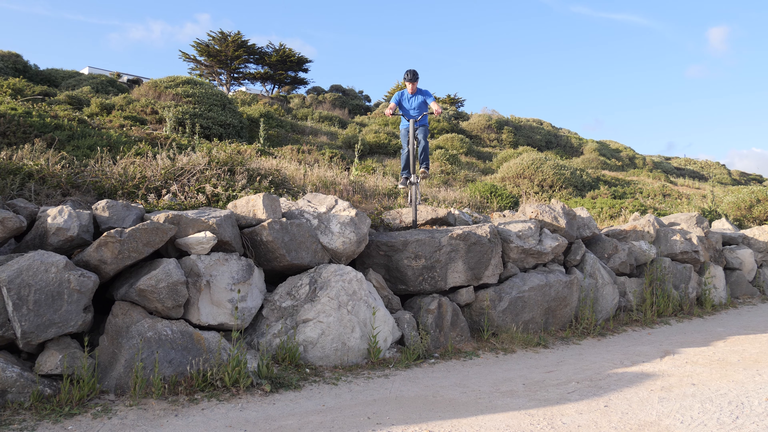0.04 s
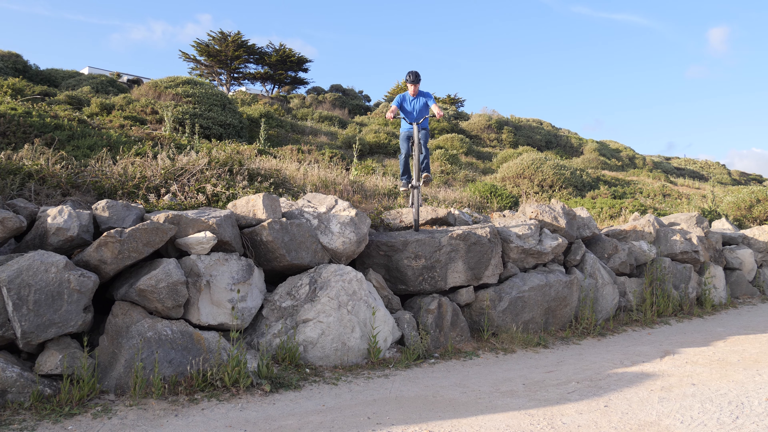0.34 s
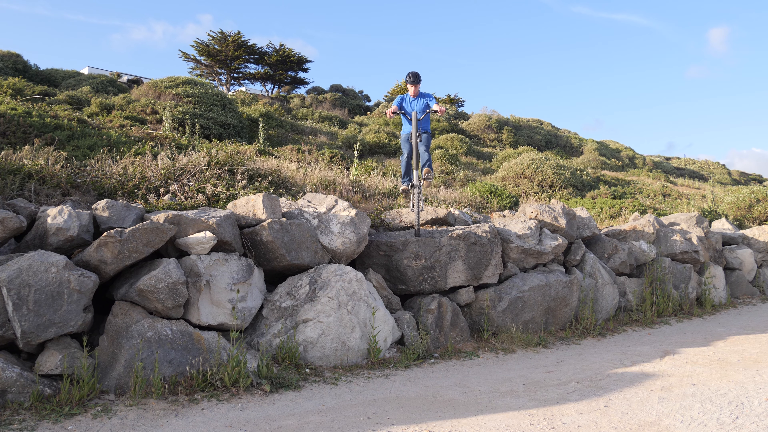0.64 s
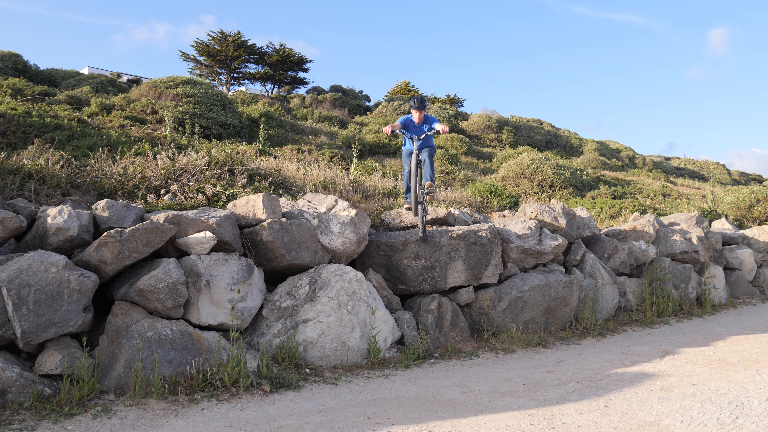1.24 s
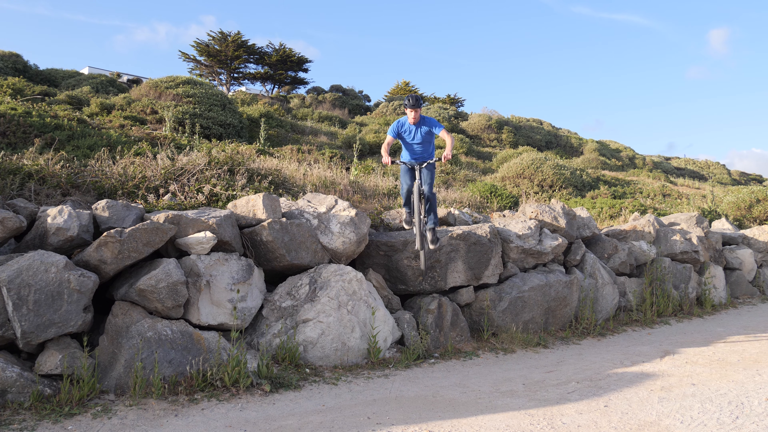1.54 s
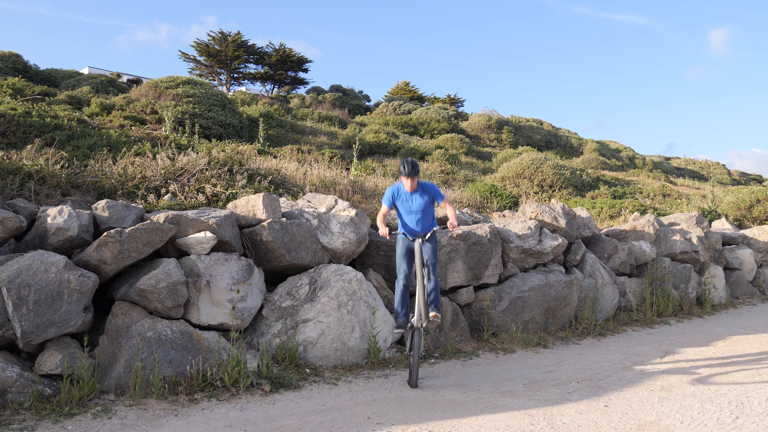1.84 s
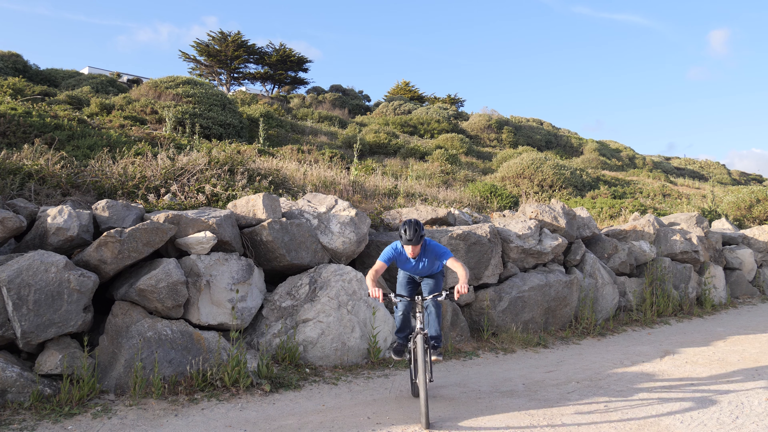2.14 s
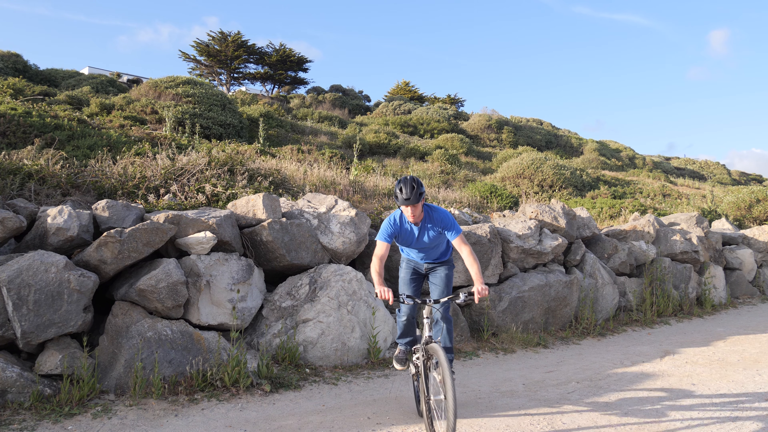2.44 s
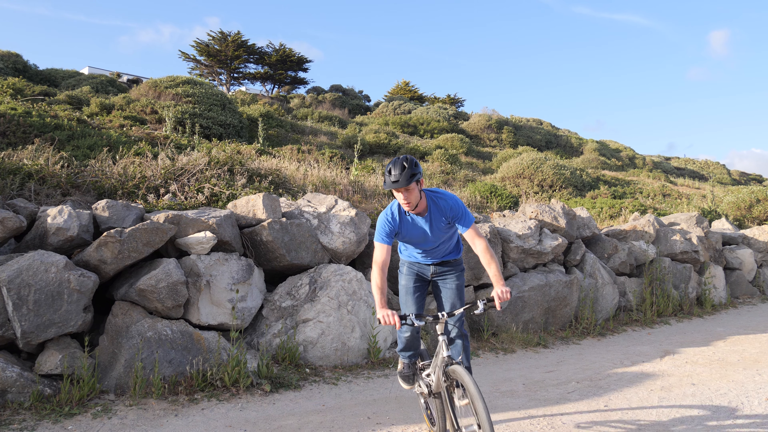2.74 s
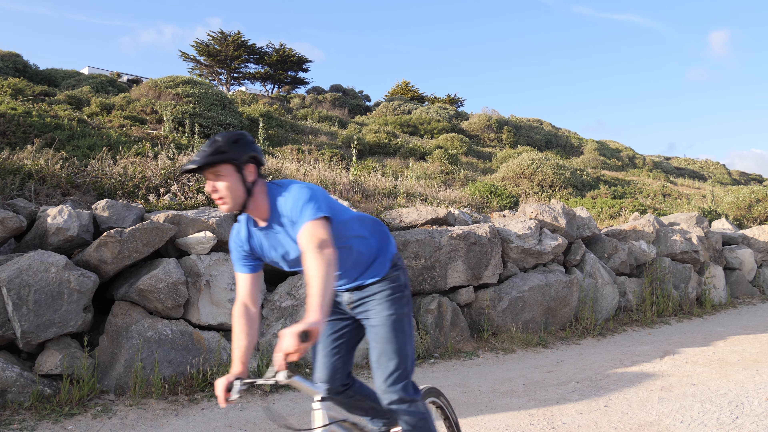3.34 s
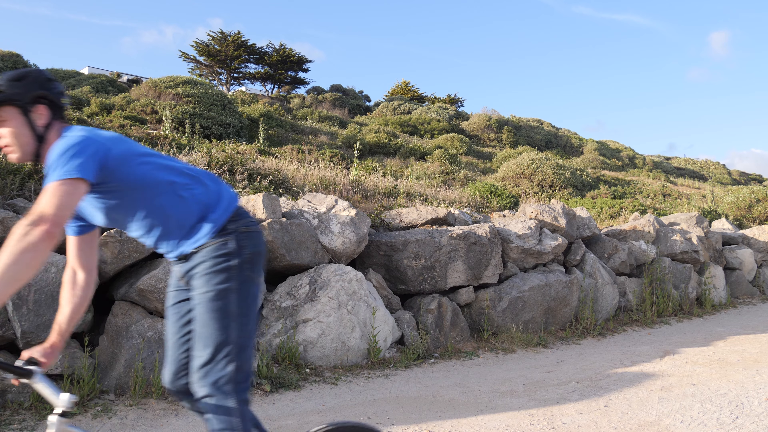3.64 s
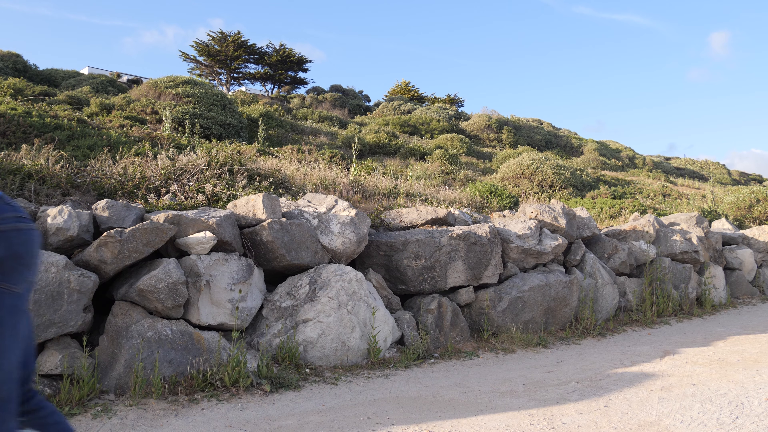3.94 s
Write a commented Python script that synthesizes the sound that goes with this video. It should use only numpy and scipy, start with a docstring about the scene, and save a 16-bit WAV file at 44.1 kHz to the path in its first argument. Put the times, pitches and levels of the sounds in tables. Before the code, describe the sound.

Outdoors, a bike shifts on rock with soft clicks, then hops down with a brief squeal of brakes. Its hub ticks as it rolls close by over gravel and popping stones, with wind rumbling on the microphone throughout.

```python
"""Trials bike hopping off a rock

A bike shuffles on a rock wall, hops off, lands with squealing brakes and rolls past on gravel.
Its freehub ticks as small catches (pawls) drop over teeth, and the brake pads make the disc sing.
A tyre creaks as it sticks and slips on the rock, and stones pop from under the wheels.
Wind buffets the microphone throughout, over a faint outdoor hush."""
import sys
import numpy as np
from scipy import signal
from scipy.fft import rfft, irfft
from scipy.io import wavfile
from scipy.ndimage import uniform_filter1d

SR = 44100
rng = np.random.default_rng(int(sys.argv[2]) if len(sys.argv) > 2 else 0)


def master_out(mix):
    """Clip the mix to full scale and print it as 16-bit PCM to the path in sys.argv[1]."""
    frames = np.transpose(np.atleast_2d(mix))
    ceiling = np.clip(frames, -1, 1)
    pcm = np.round(ceiling * 32767).astype(np.int16)
    wavfile.write(sys.argv[1], SR, pcm)


N = 176400
T = np.arange(N) / SR

# How loud the wind, gravel and spinning tyres are. Each row: time in seconds, level in dB.
WIND_LEVELS = [(0, -26.5), (.3, -30), (.8, -19), (1.08, -24.5), (1.3, -15.5), (1.55, -19.5), (1.9, -13),
               (2.4, -15.5), (2.75, -14), (3.15, -12), (3.55, -12.5), (3.85, -10.5), (4, -21.5)]
GRAVEL_LEVELS = [(1.86, -45), (1.92, -44), (2.15, -43), (2.3, -47.5), (2.6, -53.5), (2.9, -46), (3.08, -40),
                 (3.29, -34.5), (3.39, -37), (3.44, -35.5), (3.5, -34), (3.58, -32), (3.7, -38.5),
                 (3.82, -35.5), (3.9, -43.5), (3.97, -50), (4, -29.5)]
WHIRR_LEVELS = [(1.6, -54), (1.66, -43.5), (1.85, -49.5), (1.9, -48)]
# The tone colour of each noisy sound. Each row: frequency in Hz, level in dB.
WIND_COLOUR = [(10, -6.5), (22, 5), (35, 0), (70, -12), (100, -17.5), (160, -25), (220, -28.5), (400, -39),
               (12000, -115)]
HUSH_COLOUR = [(400, -2), (1600, -4.5), (2500, -9.5), (6500, -16), (9000, -20.5), (11000, -34),
               (16000, -43)]
GRAVEL_COLOUR = [(120, -7.5), (220, -11), (450, -2), (1400, -4.5), (2700, -9), (4200, -21.5), (8000, -22.5),
                 (16000, -34)]
CRACK_COLOUR = [(300, -11.5), (1400, -1.5), (2200, -7.5), (4200, -12), (16000, -36.5)]
TYRE_COLOUR = [(400, -22), (850, -7.5), (1100, -6.5), (1500, 3.5), (1850, 0), (2250, 0.5), (2800, -10.5),
               (12000, -30)]
RASP_COLOUR = [(500, -13.5), (1400, -6.5), (2200, -9), (2850, 3.5), (4000, -11), (5500, -10.5), (9000, -32)]
HUB_COLOUR = [(500, -18), (1500, -25), (2500, 1.5), (3500, 5), (4300, -4.5), (6000, -5), (7500, 0),
              (8500, 5), (10100, -10), (12300, -2), (12900, -7), (13600, 6.5), (14400, -10), (15700, 0.5)]
WHEEL_COLOUR = [(700, -20), (1500, 4), (3500, 2.5), (4800, -4.5), (8500, 3), (10200, -8.5), (13500, -4),
                (14600, -31)]
# Wind thumps and stone pops. Each row: time in seconds, peak in dB, pitch in Hz, width in cycles.
WIND_THUMPS = [(1.28, -13, 36.5, 0.86), (2.545, -2, 52.8, 0.92)]
STONE_POPS = [(3.297, -1.5, 1700, 1.03), (3.2973, -10.5, 4160, 1), (3.3026, -18, 1500, 1.4),
              (3.311, -22.5, 2100, 2.5), (3.407, -20, 1900, .5), (3.5938, -12.5, 1430, 1.9)]
# A tyre twists on rock. Each row: time in seconds, slips per second, level in dB, resonance in Hz.
CREAK = [(.19, 370, -60, 1050), (.25, 357, -51.5, 1090), (.42, 360, -47.5, 1110), (.45, 368, -48, 2010),
         (.51, 358, -45, 1780), (.555, 270, -48, 1500)]
# Tyre blows. Each row: peak time in seconds, level in dB, rise and decay in seconds, centre in Hz.
BLOWS = [(.181, -36.5, 0.0026, .018, 483), (.182, -36, .0015, 0.0084, 2300),
         (1.475, -32.5, .0015, 0.014, 1320), (1.881, -27, 0.0009, 0.0064, 1200),
         (1.892, -32, .0029, 0.015, 614), (2.103, -20, 0.0055, 0.016, 1300),
         (2.336, -34, .0006, 0.0038, 1160), (2.706, -35.5, 0.00071, 0.0061, 746),
         (3.08, -32.5, 0.017, 0.011, 1430), (3.493, -27.5, 0.0065, 0.019, 1240),
         (3.545, -31, 0.00091, .005, 1300), (3.57, -22.5, .003, 0.0084, 1250),
         (3.593, -23.5, 0.011, .0043, 1370), (3.651, -21, .0011, .0024, 1400),
         (3.663, -25, .003, 0.011, 1800), (3.751, -23.5, 0.0065, 0.01, 789),
         (3.828, -31.5, 0.0017, 0.011, 1400)]
# A blow's tone colour. Each row: multiple of its centre frequency, level in dB.
BLOW_COLOUR = [(.15, -11), (.5, -1), (1, 2), (1.3, 0), (2, -8.5), (8, -34.5)]
# Metal knocks and lone pawl clicks. Each row: start in seconds, level in dB.
KNOCKS = [(1.484, -35.5), (2.1322, -23), (2.177, -36)]
PAWL_CLICKS = [(.139, -42), (.157, -46), (.180, -41), (.2585, -44), (.7883, -41.5), (.9314, -46),
               (1.0113, -43), (1.0656, -41), (1.0886, -42), (1.112, -46), (1.152, -38), (1.175, -48),
               (1.188, -40.5), (1.21, -44), (1.2348, -43.5), (1.2647, -45), (1.324, -42.5)]
# The notes that metal parts ring at. Each row: pitch in Hz, level in dB, seconds to fade by 60 dB.
KNOCK_MODES = [(1580, -18, .072), (3040, -2, 0.033), (3260, -3.5, 0.023), (8400, -6.5, .019)]
DISC_MODES = [(791, -29, 0.16), (805, -42, 1.1)]
HUB_MODES = [(6780, -26.5, 0.094), (7900, -23, 0.085), (8560, -25.5, 0.079)]
# The brake disc shudders. Each row: time in seconds, level in dB.
JUDDER_LEVELS = [(2.075, -42), (2.09, -30), (2.103, -22.5), (2.115, -28), (2.13, -42)]
# One table per squeal. Each row: time in seconds, pitch in Hz, level in dB, roughness (0 is clean).
SQUEALS = [
    [(.64, 1450, -46, 1), (.650, 1400, -34.5, 1), (.664, 1430, -49, 0.9)],
    [(1.905, 1520, -46, 1), (1.92, 1443, -39, 1.1), (1.945, 1400, -51, 0.9)],
    [(1.973, 1480, -44, 1), (1.979, 1474, -34.5, 0.96), (1.994, 1544, -30.5, .15),
     (2.008, 1454, -21.5, 0.15), (2.022, 1425, -22, .08), (2.032, 1342, -34.5, 0.5), (2.04, 1385, -34, 0.3),
     (2.056, 1470, -41, 0.4), (2.066, 1464, -30, 0.52), (2.088, 1438, -23.5, 0.05),
     (2.097, 1427, -35, 0.45), (2.126, 1438, -37, 0.2)],
]
# A squeal's harmonics, lowest first. Each row: level in dB when clean, level in dB when rough.
SQUEAL_HARMONICS = [(2, 0.5), (-10, -1), (-22, -13.5), (-35, -11.5)]
# One table per spin of the freehub. Each row: time in seconds, ticks per second, level in dB.
HUB_SPINS = [
    [(.485, 58, -48), (.51, 110, -44.5), (.56, 164, -42), (.655, 145, -46), (.675, 100, -60)],
    [(1.608, 230, -44.5), (1.74, 300, -38.5), (1.82, 336, -38.5), (1.92, 187, -39), (1.97, 120, -47.5),
     (2.05, 80, -49.5), (2.3, 98, -46), (2.52, 101, -45), (2.56, 66, -51.5), (2.74, 78, -46.5),
     (2.85, 98, -43), (3.05, 123, -41.5), (3.33, 140, -47.5), (3.5, 127, -39), (3.66, 120, -36),
     (3.72, 106, -37.5), (4.0, 107, -37.5)],
]


def undb(db):
    """Turn decibels into a gain."""
    return 10 ** (np.asarray(db) / 20)


def noise():
    """White noise of unit level."""
    return rng.standard_normal(N)


def curve(rows, column=1):
    """One column of a table, joined by straight lines in time."""
    rows = np.array(rows)
    return np.interp(T, rows[:, 0], rows[:, column])


def loudness(rows, column=1):
    """Gain from a dB column, silent outside the table's times."""
    return undb(curve(rows, column)) * (T >= rows[0][0]) * (T <= rows[-1][0])


def drift(rate_hz):
    """A smooth random wander of unit spread."""
    width = max(int(SR / rate_hz), 1)
    smooth = uniform_filter1d(uniform_filter1d(noise(), width), width)
    return smooth / smooth.std()


def colour(x, points, size=16384):
    """Give x a tone colour; white noise keeps its power."""
    hz, db = np.array(points).T
    gain = undb(np.interp(np.log(np.arange(size // 2 + 1) * SR / size + 1), np.log(hz), db))
    # fold the filter so that it never rings before a sound
    cepstrum = irfft(np.log(gain))
    cepstrum[1:size // 2] *= 2
    cepstrum[size // 2 + 1:] = 0
    response = irfft(np.exp(rfft(cepstrum)))
    return signal.fftconvolve(x, response / np.linalg.norm(response))[:N]


def fade(x, decay_s):
    """Give each spike in x a dying tail."""
    return signal.lfilter([1], [1, -np.exp(-1 / (SR * decay_s))], x + 1e-18)


def kicks(rows):
    """One spike per row, at its time and level."""
    out = np.zeros(N)
    for at, db, *_ in rows:
        out[int(at * SR)] += undb(db)
    return out


def ring(x, modes):
    """Fading notes set going by x."""
    t = T[:SR]
    notes = sum(undb(db - 60 * t / t60) * np.sin(2 * np.pi * hz * t) for hz, db, t60 in modes)
    return signal.fftconvolve(x, notes)[:N]


def pulses(rows):
    """Pressure pulses, each only a few waves long."""
    out = 0
    for at, db, hz, cycles in rows:
        swell = np.exp(-np.minimum(((T - at) * hz / cycles) ** 2, 20))
        out += undb(db) * swell * np.cos(2 * np.pi * hz * (T - at))
    return out


def wind(hush_db=-47.5):
    """Gusts rumble and thump on the microphone over a steady hush."""
    rumble = colour(noise(), WIND_COLOUR) * undb(curve(WIND_LEVELS) + 1.83 * drift(27))
    hush = colour(noise(), HUSH_COLOUR) * undb(hush_db + .5 * drift(1))
    return rumble + pulses(WIND_THUMPS) + hush


def gravel(grains_per_s=2200, spread_db=3.5, grain_s=.0006):
    """Many tiny grains are crushed under the tyres."""
    grains = rng.random(N) < grains_per_s / SR
    strength = undb(spread_db * np.minimum(rng.exponential(size=N), 5))
    power = fade((grains * strength) ** 2, grain_s / 2)
    return colour(np.sqrt(power / power.mean()) * noise(), GRAVEL_COLOUR) * loudness(GRAVEL_LEVELS)


def stones():
    """A pinched stone snaps free: a sharp pulse, a crack and scattering grit."""
    snaps = kicks(STONE_POPS)
    crack = undb(-19) * fade(snaps, decay_s=.0022)
    grit = undb(-26) * fade(snaps, decay_s=.023)
    return pulses(STONE_POPS) + colour(noise() * (crack + grit), CRACK_COLOUR)


def tyre_whirr():
    """The spinning tyres whirr in flight."""
    return colour(noise(), TYRE_COLOUR) * loudness(WHIRR_LEVELS)


def tyre_creak(jitter=.036, rasp=.51, resonance_db=-2, width_hz=260):
    """Rubber sticks and slips on rock; the overtone nearest a moving resonance stands out."""
    rate = curve(CREAK) * (1 + jitter * drift(455))
    cycles = np.cumsum(rate) / SR
    slips = np.diff(np.floor(cycles), prepend=0)
    rub = colour((slips - slips.mean()) / slips.std() + rasp * noise(), TYRE_COLOUR)
    resonance_hz = curve(CREAK, column=3)
    overtones = 0
    for k in range(2, 8):
        nearness = np.exp(-((k * rate - resonance_hz) / width_hz) ** 2)
        overtones += nearness * np.cos(2 * np.pi * k * cycles)
    return (rub + undb(resonance_db) * overtones) * loudness(CREAK, column=2)


def tyre_blows():
    """A tyre bites into rock or grit with a short swell of crunch."""
    out = 0
    for at, db, rise, decay, hz in BLOWS:
        from_peak = np.maximum((at - T) / rise, (T - at) / decay)
        swell = np.exp(-np.minimum(from_peak, 20))
        tone = [(hz * multiple, level) for multiple, level in BLOW_COLOUR]
        out += undb(db) * colour(swell * noise(), tone)
    return out


def metal_knocks():
    """Knocks set the bike's metal ringing."""
    return ring(kicks(KNOCKS), KNOCK_MODES)


def disc_judder(hz=813, wobble_radians=.37, grab_s=2.112):
    """As the pads grab, the disc shudders at a low note and its octave, then rings on."""
    phase = 2 * np.pi * hz * T + wobble_radians * drift(150)
    shudder = (np.sin(phase) + np.sin(2 * phase)) * loudness(JUDDER_LEVELS)
    return shudder + ring(kicks([(grab_s, 0)]), DISC_MODES)


def brakes(wobble_radians=.69, flutter=.86):
    """Pads sing on the disc, rough as they bite and clean while they slide."""
    out = disc_judder()
    rasp = 2 * undb(-4.5) * colour(noise(), RASP_COLOUR)
    for squeal in SQUEALS:
        rough = np.clip(curve(squeal, column=3), 0, 1)
        phase = 2 * np.pi * np.cumsum(curve(squeal)) / SR + wobble_radians * rough * drift(500)
        tone = 0
        for k, (clean_db, rough_db) in enumerate(SQUEAL_HARMONICS, 1):
            gain = undb(clean_db + (rough_db - clean_db) * rough)
            tone += gain * np.sin(k * phase) * (1 + flutter * rough * drift(420))
        out += (np.sqrt(2) * tone + rough * rasp) * loudness(squeal, column=2)
    return out


def freehub(tick_s=.0016, tail_s=.011, tail_db=-8.5, jitter=.09, scatter_db=2):
    """Pawls drop over teeth: lone clicks when balancing, runs when coasting. Hub and wheel ring along."""
    power = 0
    for spin in HUB_SPINS:
        rate = curve(spin)
        teeth_passed = np.cumsum(rate * (1 + jitter * drift(90))) / SR
        ticks = np.diff(np.floor(teeth_passed), prepend=0)
        strength = loudness(spin, column=2) * undb(scatter_db * noise())
        density = rate * (tick_s + tail_s * undb(tail_db) ** 2) / 2
        power += (ticks * strength) ** 2 / density  # faster ticking is no louder
    drops = kicks(PAWL_CLICKS)
    balancing = colour(fade(drops, decay_s=.009) * noise(), HUB_COLOUR) * undb(-.5)
    coasting = np.sqrt(fade(power, tick_s / 2)) * noise()
    hub_shell = ring(fade(drops, tick_s) * noise() + undb(-9.5) * coasting, HUB_MODES)
    wheel = undb(tail_db) * colour(np.sqrt(fade(power, tail_s / 2)) * noise(), WHEEL_COLOUR)
    return balancing + colour(coasting, HUB_COLOUR) + hub_shell + wheel


def scene():
    """The bike, the ground and the wind, in one channel."""
    bike = freehub() + tyre_creak() + brakes() + tyre_blows() + metal_knocks() + tyre_whirr()
    ground = gravel() + stones()
    return (bike + ground + wind())[None]


def record(dry, top_hz=15650):
    """Clip the sound at full scale and cut the highest treble."""
    lowpass = signal.ellip(10, .2, 80, top_hz, fs=SR, output="sos")
    return signal.sosfilt(lowpass, np.clip(dry, -1, 1))


dry = scene()
out = record(dry)
master_out(out)
```